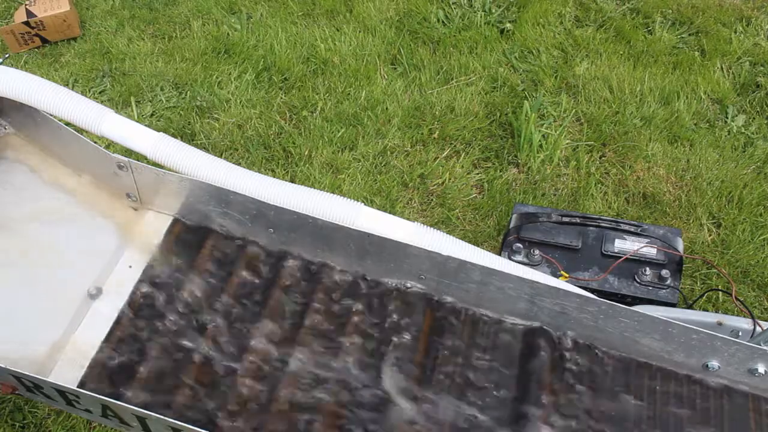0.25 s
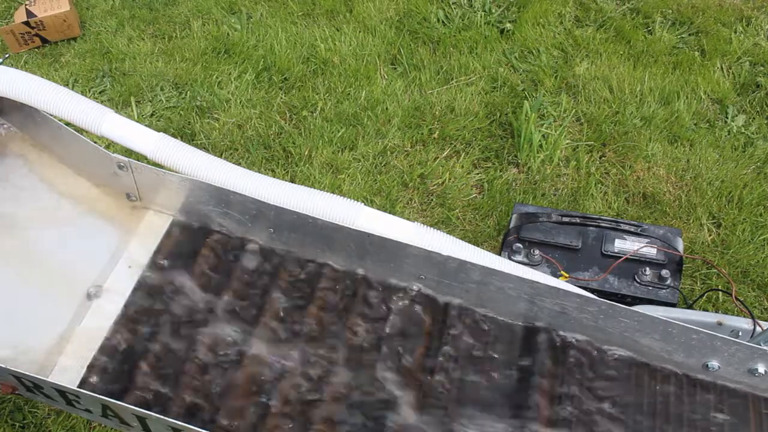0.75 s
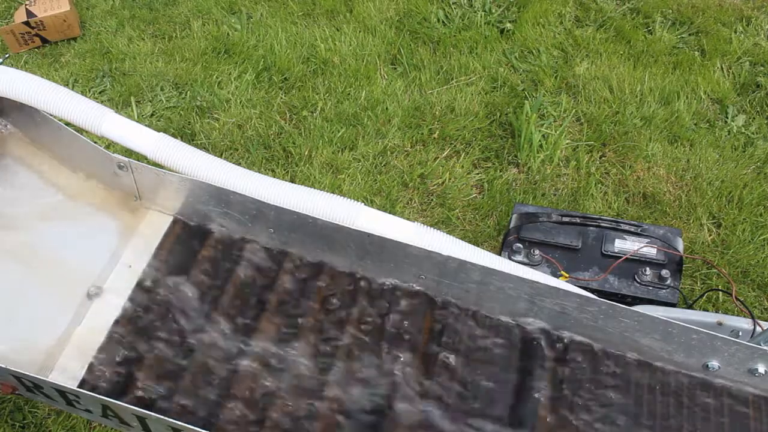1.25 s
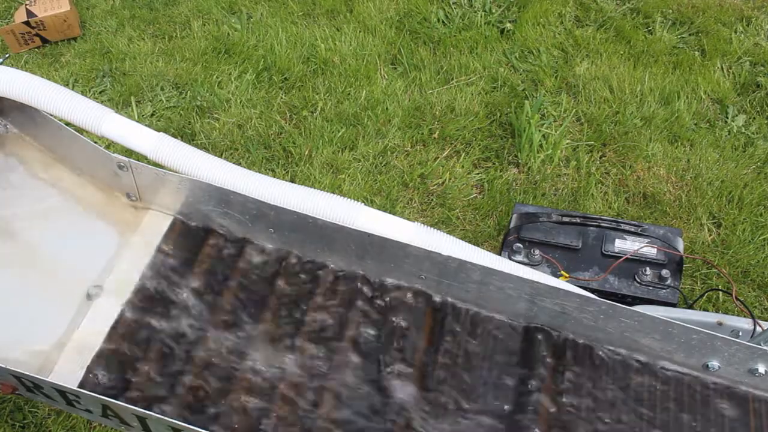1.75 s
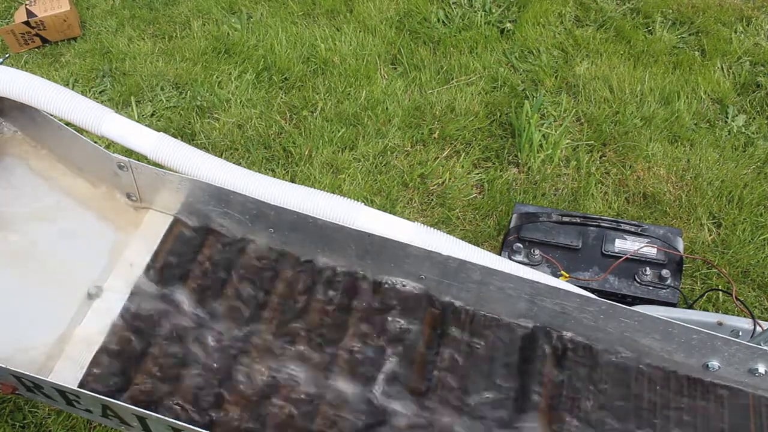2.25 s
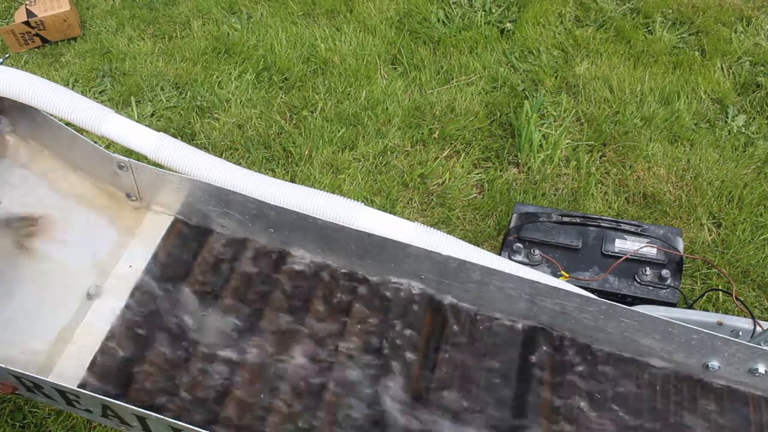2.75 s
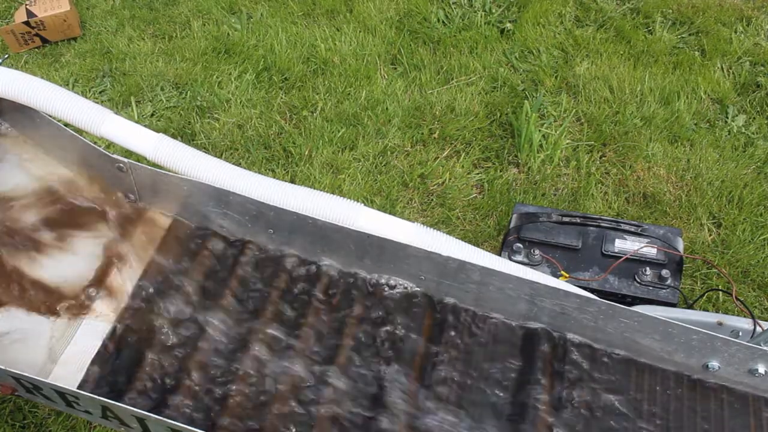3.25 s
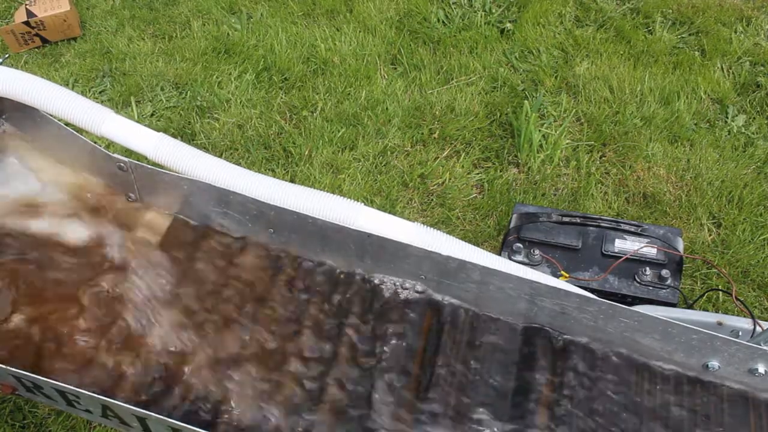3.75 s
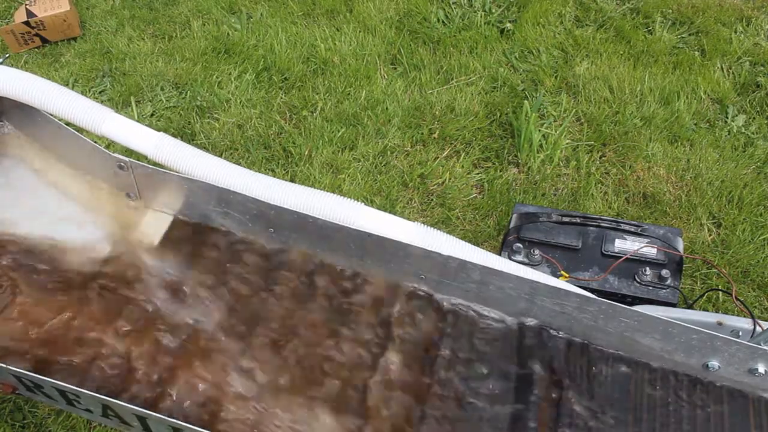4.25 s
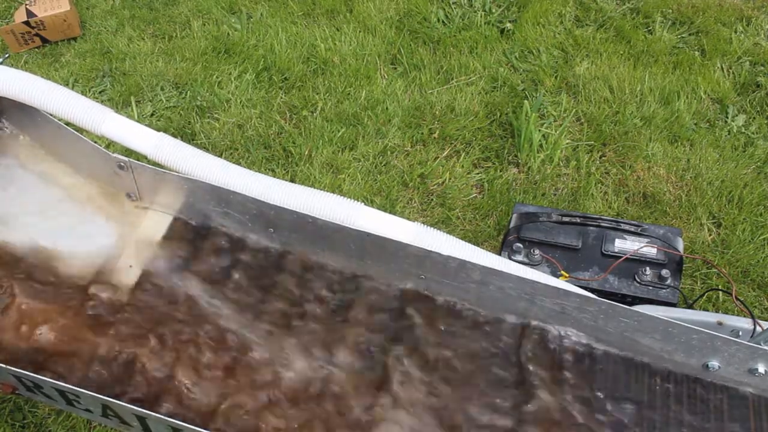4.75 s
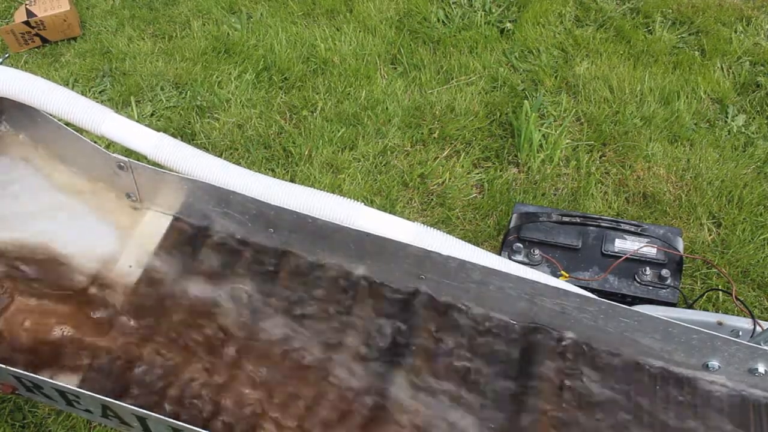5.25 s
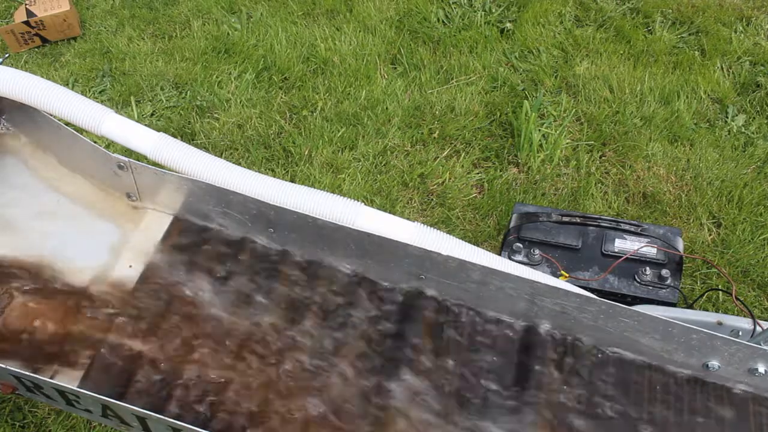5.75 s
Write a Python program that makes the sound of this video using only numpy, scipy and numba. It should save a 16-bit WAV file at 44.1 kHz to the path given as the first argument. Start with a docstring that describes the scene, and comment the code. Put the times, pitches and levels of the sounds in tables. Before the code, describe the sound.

Close running water bubbles over metal ridges as a pump hums quietly; midway, a quick knock and a soft slump of dirt.

```python
"""Water in a sluice box

Pumped water runs down a metal sluice box, close by. Air pockets gulp behind the riffles
(ridges across the box), small bubbles and spray crackle over a soft wash, and the pump hums below.
Halfway through, something knocks on the box and a load of dirt slumps into the feed tray."""
import sys
import numpy as np
from scipy import signal
from scipy.fft import rfft, irfft
from scipy.io import wavfile
from scipy.ndimage import map_coordinates
from numba import njit

SR = 44100
rng = np.random.default_rng(int(sys.argv[2]) if len(sys.argv) > 2 else 0)


def int16_out(signal):
    """Quantize to a 16-bit WAV file."""
    q = np.round(np.clip(np.atleast_2d(signal).T, -1, 1) * 32767)
    wavfile.write(sys.argv[1], SR, q.astype(np.int16))


N = 264600

# Levels in the tables are relative: the functions turn whole layers up or down.
# The stream rushes for a second, then evens out. Each row: time in seconds, churn in dB, spray in dB.
FLOW_LEVELS = [(0.0, -35.5, -24.5), (0.08, -31.5, -29.5), (0.34, -22.5, -25), (0.72, -28, -27),
               (0.8, -19.5, -26.5), (0.94, -26, -25), (1.1, -24, -27.5), (1.16, -28.5, -29),
               (1.96, -30, -28), (2.05, -30, -30), (3.02, -28.5, -31), (3.15, -32.5, -35.5),
               (3.28, -29.5, -29), (3.55, -31.5, -31.5), (3.76, -25.5, -30.5), (4.5, -31, -30),
               (5.02, -30.5, -30), (5.2, -28, -31.5), (5.42, -32.5, -29.5), (6.0, -28, -27.5)]
# The loudest air pockets closing. Each row: start in seconds, pitch in Hz, level in dB.
LOUD_GULPS = [(0.299, 1060, -16), (0.328, 1480, -10), (0.432, 1140, -14), (0.678, 1040, -8),
              (0.769, 866, -10), (0.792, 1100, -20), (0.862, 980, -12.5), (1.095, 1320, -11),
              (1.108, 1480, -12), (1.292, 1720, -14), (1.46, 1230, -15), (1.519, 1020, -11),
              (1.584, 1640, -18), (1.692, 900, -13.5), (1.814, 1030, -14), (1.832, 950, -15),
              (1.859, 604, -16.5), (1.868, 1770, -13.5), (1.899, 860, -11.5), (1.97, 820, -10),
              (2.125, 1670, -15), (2.149, 1000, -13.5), (2.185, 970, -10.5), (2.218, 1060, -14.5),
              (2.344, 860, -13), (2.354, 1100, -10.5), (2.403, 1930, -14), (2.509, 1020, -10.5),
              (2.627, 1160, -13), (3.126, 830, -18), (3.333, 1020, -12.5), (3.515, 1830, -14.5),
              (3.654, 1110, -13.5), (4.126, 1006, -13.5), (4.204, 930, -16), (4.399, 1780, -13.5),
              (4.434, 1430, -14), (4.5, 1270, -9.5), (4.773, 890, -12.5), (5.095, 870, -12.5),
              (5.111, 885, -15), (5.152, 900, -12.5), (5.167, 900, -13.5), (5.254, 1290, -14),
              (5.628, 1640, -10), (5.653, 1090, -11)]
# Each riffle sheds lesser pockets. Each row: pitch in Hz, pockets per second, dB added to the churn level.
RIFFLE_POCKETS = [(922, 9, 6), (1122, 11, 4.5), (1700, 6, 5.5)]
# The loudest flung drops landing. Each row: start in seconds, pitch in Hz, level in dB.
LOUD_DROPS = [(0.244, 6520, -12.5), (0.716, 6600, -18.5), (1.002, 3750, -13.5), (1.169, 6800, -18),
              (2.718, 4840, -16), (2.916, 4720, -15.5), (2.953, 5350, -16), (4.022, 4760, -18),
              (4.167, 5550, -17), (4.888, 2800, -17), (5.237, 4100, -17), (5.534, 5480, -18),
              (5.537, 3780, -16), (5.75, 5700, -14)]
# Tiny droplets bursting close by. Each row: start in seconds, level in dB.
CLOSE_TICKS = [(1.998, -22), (2.3656, -23.5), (2.7207, -28), (3.3757, -27), (5.7067, -28)]
# Hard knocks on the box. Each row: start in seconds, crack level in dB, body level in dB.
BOX_KNOCKS = [(2.9983, -11, -30), (3.006, -17.5, -37), (3.01, -35, -16.5)]
# The box's own notes. Each row: pitch in Hz, level in dB, seconds to fade by 60 dB.
BOX_NOTES = [(163, -4, 0.11), (210, -2, 0.064), (337, -1, 0.073), (505, -12.5, 0.053), (554, -19, 0.1),
             (657, 4.5, 0.033), (873, -9, 0.077), (1000, -26, .05), (1053, -5, 0.11)]

# Sounds that swell and fade. Each row: start in seconds, length in seconds, level in dB.
SPRAY_SURGES = [(0.77, 0.105, -23.5), (0.99, 0.1, -21)]
HOLLOW_SWELLS = [(.315, 0.167, -28)]
DIRT_SLUMPS = [(3.203, 0.045, -23)]
BREEZE_PUFFS = [(.84, 0.21, -47), (1.92, .14, -60)]

# The pump's hum. Each row: multiple of the turning rate, level in dB.
HUM_TONES = [(5, 0.5), (6, -1.5), (7, -6), (8, -4)]
# A low drone beside the hum, led by the pump's deepest hum tone near 53.6 Hz, which follows the drone's level.
# Each row: pitch in Hz, level in dB.
DRONE_TONES = [(53.6, -9.5), (83.7, -4), (99, -1.5), (117.3, -9.5), (330.7, -11)]
# How hum and drone rise and fall. Each row: time in seconds, level in dB.
HUM_CURVE = [(0, -42.5), (2.2, -48.5), (3.9, -48), (4.7, -42), (6, -45)]
DRONE_CURVE = [(0, -45), (2.5, -42), (6, -41)]

# Tone colours, from bass to treble. Each row: frequency in Hz, level in dB.
WASH_COLOUR = [(40, -44), (90, 1), (200, -5.5), (340, 4), (480, -2.5), (900, -2.5), (2500, -2), (4200, -4),
               (7000, -13), (10000, -21.5), (15000, -37)]
CHURN_COLOUR = [(300, -22), (620, -12), (790, -3.5), (950, -1), (1200, 2.5), (1450, 0.5), (2000, -2),
                (2800, -3.5), (4000, -18.5)]
SPRAY_COLOUR = [(900, -5), (1800, -4.5), (2700, 0.5), (3200, -2.5), (4100, 2.5), (5500, 3), (7200, 1),
                (9000, -7.5), (11000, -18.5), (13000, -25.5), (15000, -49)]
MIST_COLOUR = [(5500, -5), (8000, 2), (10500, -5), (12500, -18.5), (15000, -38)]
CRACK_COLOUR = [(300, 13), (1200, -3), (3000, 1.5), (6000, 5), (8000, 2.5), (11000, -9), (15000, -31)]
DIRT_COLOUR = [(150, -7), (330, -8), (550, 5), (680, -10), (1100, 1)]
RUMBLE_COLOUR = [(75, -5), (110, -1.5), (200, 2), (280, -2.5), (390, 3), (600, -7)]
BREEZE_COLOUR = [(22, -3), (42, 2), (90, -10)]

SLOSHES_PER_S, SLOSH_CHURN_DB, SLOSH_SPRAY_DB = 14, 2, 1.7
PUMP_TURNS_PER_S = 27.05
TREBLE_LIMIT_HZ = 15400


def stream():
    """Wavelets break over the riffles; each one drives bubbles, fizz and clicks together."""
    churn_db, spray_db = curve(FLOW_LEVELS)
    # near 1 for separate splashes; lower in a strong rush, where they merge into a hiss
    patchy = 1 / (1 + undb(2 * (spray_db + 22)))
    wavelets = patchy * wander(70)
    # the water sloshes, so churn and spray each swell and sink
    churn_db = churn_db + SLOSH_CHURN_DB * patchy * wander(SLOSHES_PER_S)
    spray_db = spray_db + SLOSH_SPRAY_DB * patchy * wander(SLOSHES_PER_S)
    bubbles = swarm(per_s=1100, lo_hz=451.4, hi_hz=3427, cycles=3.29, glide=0.13, spread_db=4.5, swell=0.44)
    fizz = swarm(per_s=1200, lo_hz=1781, hi_hz=13320, cycles=6.3, glide=0.056, spread_db=5, swell=0.52)
    clicks = swarm(per_s=1100, lo_hz=1510, hi_hz=12700, cycles=1, glide=0.017, spread_db=5, swell=0.037)
    hiss = noise(SPRAY_COLOUR) * (1 - patchy) * undb(spray_db + 5)
    wash = noise(WASH_COLOUR) * undb(0.63 * spray_db - 14.5 + wavelets)
    bubble_gain = undb(churn_db - 1 + 1.2 * wavelets + 3.8 * patchy * np.tanh(wander(90)))
    fizz_gain = np.sqrt(patchy) * undb(spray_db - 1.5 + 2 * wavelets + 1.44 * wander(80))
    click_gain = patchy * undb(spray_db - 4.5 + 2.4 * wavelets + 2.74 * wander(140))
    return (colour(bubbles, CHURN_COLOUR) * bubble_gain
            + colour(fizz, SPRAY_COLOUR) * fizz_gain
            + colour(clicks, SPRAY_COLOUR) * click_gain
            + hiss + wash)


def gulps():
    """Air pockets close, ring very briefly and spit spray; a weaker one closes just after each."""
    churn_db, _ = curve(FLOW_LEVELS)
    lesser = [scatter(per_s, hz, spread_octaves=0.1, db=churn_db + db, spread_db=5.5)
              for hz, per_s, db in RIFFLE_POCKETS]
    start, hz, db = np.vstack([LOUD_GULPS, *lesser]).T
    life, rise, lag, shift = rng.random((len(start), 4)).T
    cycles = hz * 0.0031 * (0.71 + 0.33 * life)  # each dies down in 2 to 3 milliseconds
    first = ring(start, hz, undb(db + 7), cycles, glide=0.15 * rise, swell=0.46)
    later = start + 0.006 + 0.007 * lag
    second = ring(later, hz * (1 + 0.073 * shift), undb(db - 3), cycles, glide=0.15 * life, swell=0.49)
    spit = bursts(start, db, rise_s=0.0015, decay_s=0.003) * noise(SPRAY_COLOUR)
    return first + second + undb(-6) * spit


def drops():
    """A drop slaps the surface, leaves a tiny ringing bubble and splashes back."""
    _, spray_db = curve(FLOW_LEVELS)
    lesser = scatter(per_s=5, hz=4955, spread_octaves=0.643, db=spray_db + 5.5, spread_db=5)
    start, hz, db = np.vstack([LOUD_DROPS, lesser]).T
    rise, lag = rng.random((len(start), 2)).T
    bubble = ring(start, hz, undb(db + 12), cycles=hz * 0.0017, glide=0.164 * rise, swell=0.76)
    splash_back = ring(start + 0.004 + 0.003 * lag, hz * (1 + 0.165 * rise), undb(db + 1),
                       cycles=hz * 0.00088, glide=0.1 * lag, swell=0.16)
    slap = bursts(start, db, rise_s=0.00091, decay_s=0.0037) * noise(SPRAY_COLOUR)
    return bubble + splash_back + undb(-0.5) * slap


def surges():
    """Two surges throw up hissing sheets of spray."""
    return swells(SPRAY_SURGES) * noise(SPRAY_COLOUR)


def mist():
    """The finest droplets burst in short, very bright clusters; a few tick close by."""
    _, spray_db = curve(FLOW_LEVELS)
    fainter = scatter(per_s=5, hz=0, spread_octaves=0, db=spray_db - 6, spread_db=8)[:, ::2]  # no pitch
    start, db = np.vstack([CLOSE_TICKS, fainter]).T
    pops = swarm(per_s=1200, lo_hz=5970, hi_hz=15100, cycles=6.2, glide=0.013, spread_db=5.5, swell=0.37)
    ticks = noise(MIST_COLOUR) * bursts(start, db + 7.5, rise_s=0.0003, decay_s=0.0019)
    clusters = colour(pops, MIST_COLOUR) * undb(5.3 * np.tanh(wander(60)))
    return undb(-40.5) * unit(clusters) + ticks


def hollow_note():
    """A hollow, wavering note sings briefly in the first rush."""
    hz = 705 * (1 + 0.0265 * wander(87.4))
    tone = np.sqrt(2) * np.sin(2 * np.pi * np.cumsum(hz) / SR)
    flutter = undb(2.6 * np.tanh(wander(52)))
    return swells(HOLLOW_SWELLS) * tone * flutter


def knock_and_dirt():
    """A quick triple knock on the box, then the soft, hollow thud of dirt sliding onto the tray."""
    start, crack_db, body_db = np.transpose(BOX_KNOCKS)
    blows = np.zeros(N)
    blows[(start * SR).astype(int)] = undb(body_db)
    crack = noise(CRACK_COLOUR) * bursts(start, crack_db, rise_s=0.0003, decay_s=0.0082)
    thud = swells(DIRT_SLUMPS) * unit(metal_box(noise(DIRT_COLOUR)))
    return crack + metal_box(blows) + thud


def metal_box(force):
    """The wet metal box rings briefly at its own notes and gives off no deep bass."""
    t = TIME[:SR // 2]
    ringing = sum(undb(db - 60 * t / fade_s) * np.cos(2 * np.pi * hz * t) for hz, db, fade_s in BOX_NOTES)
    band = signal.butter(2, [110, 2500], "bandpass", fs=SR, output="sos")
    return signal.sosfilt(band, signal.fftconvolve(force, ringing)[:N])


def pump():
    """The pump hums at multiples of its turning rate beside a low drone; the flow rumbles in the box."""
    hum = tones([(PUMP_TURNS_PER_S * multiple, db) for multiple, db in HUM_TONES], HUM_CURVE)
    rumble = undb(-44.5) * noise(RUMBLE_COLOUR)
    return hum + tones(DRONE_TONES, DRONE_CURVE) + rumble


def breeze():
    """Light air buffets the microphone, with two small puffs."""
    return (undb(-60) + swells(BREEZE_PUFFS)) * noise(BREEZE_COLOUR)


@njit
def ring(start, hz, gain, cycles, glide, swell):
    """Bubble tones: each swells, dies away within some cycles and rises in pitch as it nears the surface."""
    out = np.zeros(N)
    for k in range(len(start)):
        decay_s = cycles[k] / hz[k]
        first, phase = int(start[k] * SR), 0.
        for i in range(max(first, 0), min(first + int(6 * decay_s * SR), N)):
            age = (i - first) / SR / decay_s  # age and swell are counted in decay times
            pitch = hz[k] * (1 + glide[k] * (min(age, 3.) - .8))
            phase += 2 * np.pi * min(pitch / SR, .45)
            fade_in = 1 - np.exp(-(age / swell) ** 2)
            out[i] += gain[k] * fade_in * np.exp(-age) * np.sin(phase)
    return out


def swarm(per_s, lo_hz, hi_hz, cycles, glide, spread_db, swell):
    """Many random bubbles; most are faint and a few stand out."""
    when, pitch, size, life, rise, sign = rng.random((30000, 6))[:int(per_s * N / SR)].T
    hz = lo_hz * (hi_hz / lo_hz) ** pitch
    gain = np.sign(sign - .5) * undb(-spread_db * np.log(0.021 + size))
    return ring(when * N / SR, hz, gain, cycles * (.5 + life), 2 * glide * rise, swell)


def scatter(per_s, hz, spread_octaves, db, spread_db):
    """Loosely spaced events. Each row: start in seconds, pitch in Hz, level in dB near the curve db."""
    when, pitch, size = rng.random((400, 3)).T
    start = (np.arange(len(when)) + when) / per_s
    pitches = hz * 2 ** (spread_octaves * (2 * pitch - 1))
    levels = np.interp(start, TIME, db) + spread_db * (2 * size - 1)
    return np.column_stack([start, pitches, levels])[start < TIME[-1]]


def tones(rows, levels):
    """Low tones that share a level curve and waver in pitch and strength."""
    out, speed = np.zeros(N), 1 + 0.00433 * wander(2)
    for hz, db in rows:
        phase = 2 * np.pi * (np.cumsum(hz * speed) / SR + rng.random())
        out += np.sqrt(2) * np.sin(phase) * undb(db - 1.5 + 2.56 * wander(4.5))
    return out * undb(curve(levels)[0])


def bursts(starts, levels_db, rise_s, decay_s):
    """A loudness shape that jumps up and dies away at each start."""
    out, t = np.zeros(N), TIME[:SR // 10]
    for start, db in zip(starts, levels_db):
        add(out, start, undb(db) * (1 - np.exp(-t / rise_s)) * np.exp(-t / decay_s))
    return out


def swells(rows):
    """A loudness shape made of rounded humps."""
    out = np.zeros(N)
    for start, length, db in rows:
        add(out, start, undb(db) * np.sin(np.linspace(0, np.pi, int(length * SR))))
    return out


def noise(points):
    """Steady noise with the given tone colour."""
    return colour(rng.standard_normal(N), points)


def colour(x, points):
    """Filter a sound to a tone colour and bring it to strength 1."""
    hz, db = np.transpose(points)
    octave = np.log2(np.maximum(np.arange(N // 2 + 1) * SR / N, 1))
    octaves_outside = np.maximum(np.log2(hz[0]) - octave, 0) + np.maximum(octave - np.log2(hz[-1]), 0)
    gain = undb(np.interp(octave, np.log2(hz), db) - 20 * octaves_outside)
    # fold the filter forward in time, so it rings only after a sound and never before
    folded = irfft(np.log(gain), N)
    folded[1:N // 2] *= 2
    folded[N // 2 + 1:] = 0
    return unit(irfft(rfft(x) * np.exp(rfft(folded)), N))


def wander(per_s):
    """A random drift of strength 1 that heads for a new value per_s times a second."""
    targets = rng.standard_normal(4096)
    return unit(map_coordinates(targets, [TIME * per_s], order=1, mode="wrap"))


def curve(rows):
    """Join a table's timed points with straight lines, one curve for each level column."""
    times, *columns = np.transpose(rows)
    return [np.interp(TIME, times, column) for column in columns]


def add(out, start_s, sound):
    """Mix a short sound in at its start time."""
    i = int(np.clip(start_s * SR, 0, N - 1))
    out[i:i + len(sound)] += sound[:N - i]


def unit(x):
    """Scale to an average strength (rms) of 1."""
    return x / np.sqrt(np.mean(x ** 2) + 1e-18)


def undb(db):
    """Turn decibels into a number to multiply by."""
    return 10 ** (np.asarray(db) / 20)


def scene():
    """All sources in the open air, in one channel and without echo."""
    water = stream() + surges() + mist() + gulps() + drops() + hollow_note()
    return (water + pump() + knock_and_dirt() + breeze())[None]


def record(dry):
    """Hold peaks to full scale and cut the highest treble."""
    treble_cut = signal.ellip(8, .2, 70, TREBLE_LIMIT_HZ, fs=SR, output="sos")
    return signal.sosfilt(treble_cut, np.clip(dry, -1, 1))


TIME = np.arange(N) / SR  # seconds

dry = scene()
out = record(dry)
int16_out(out)
```